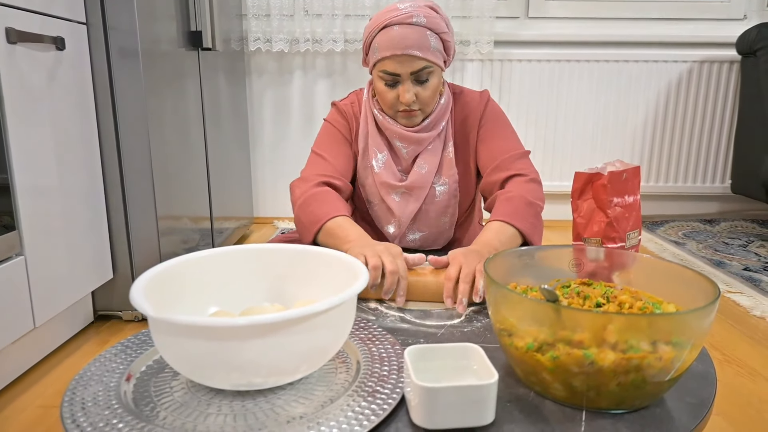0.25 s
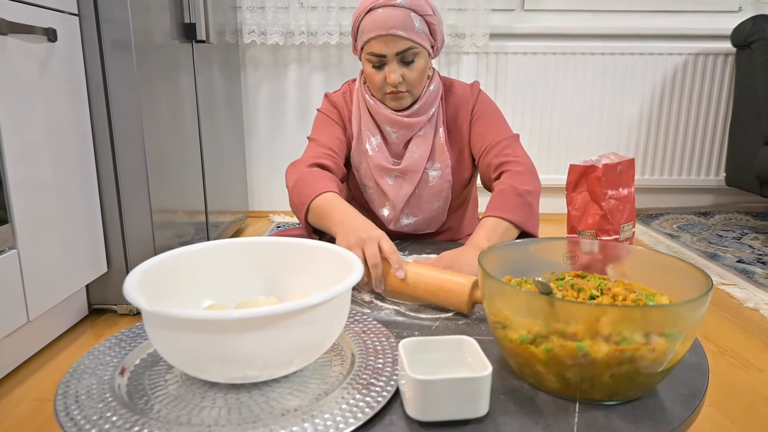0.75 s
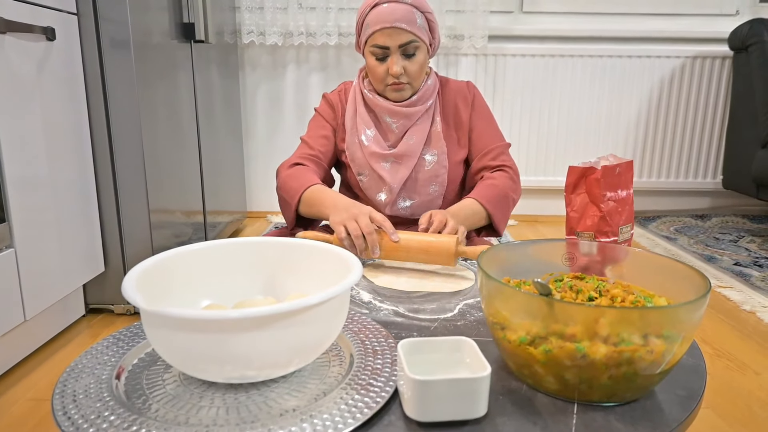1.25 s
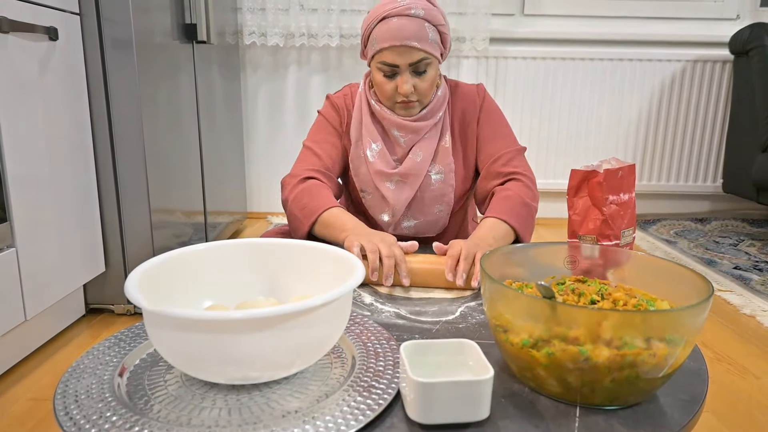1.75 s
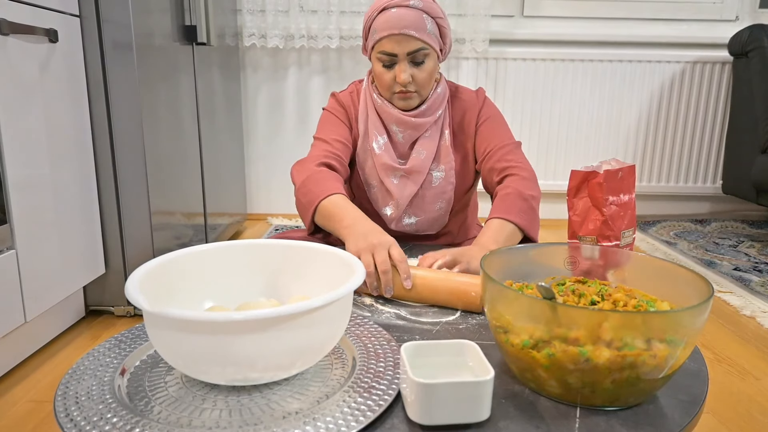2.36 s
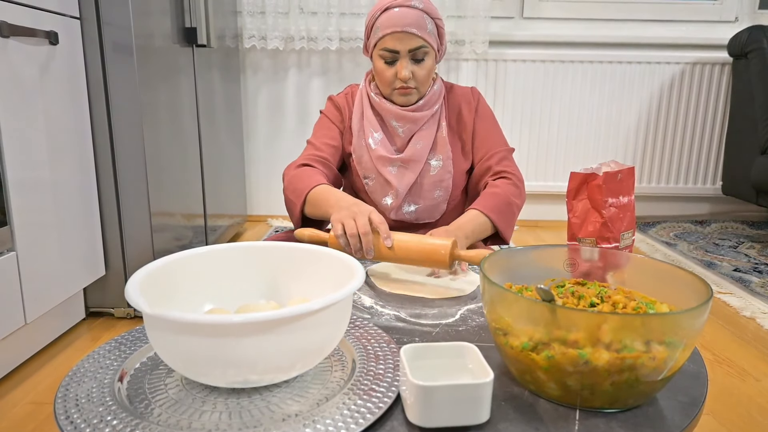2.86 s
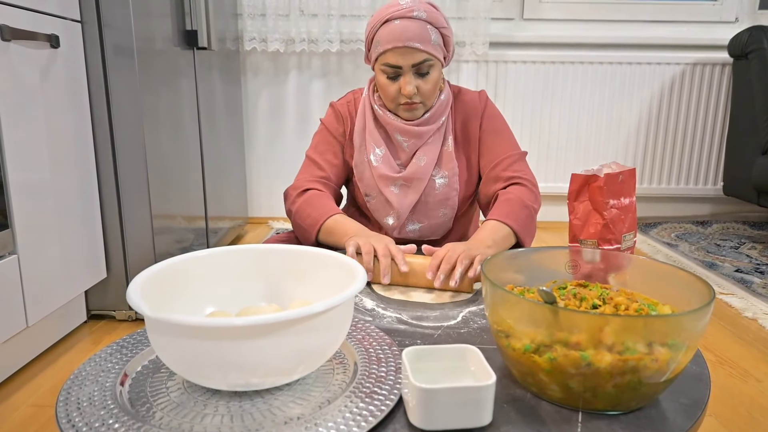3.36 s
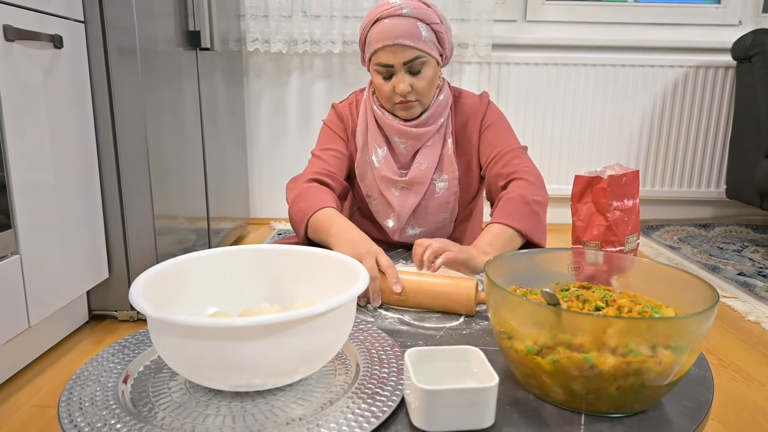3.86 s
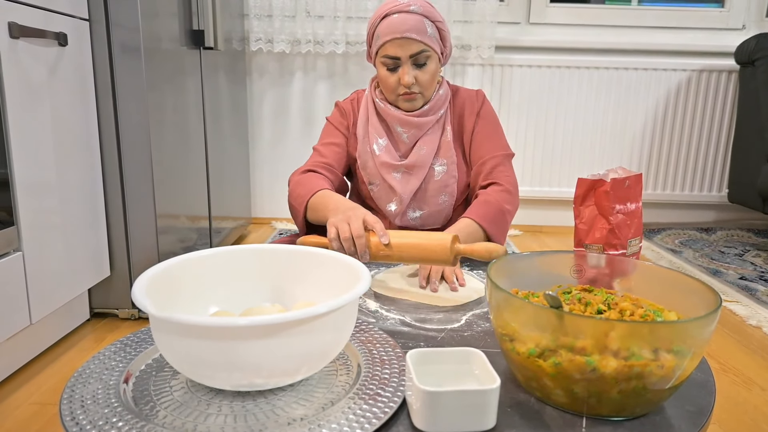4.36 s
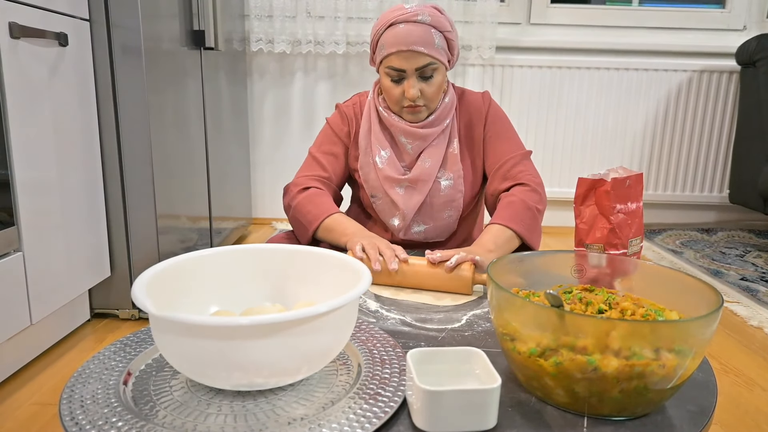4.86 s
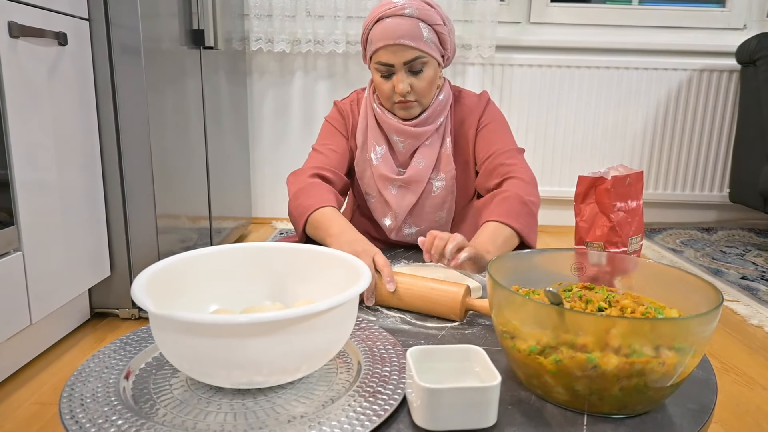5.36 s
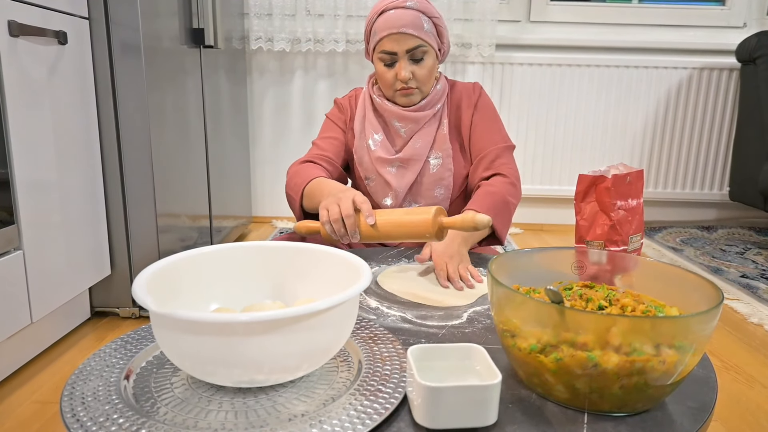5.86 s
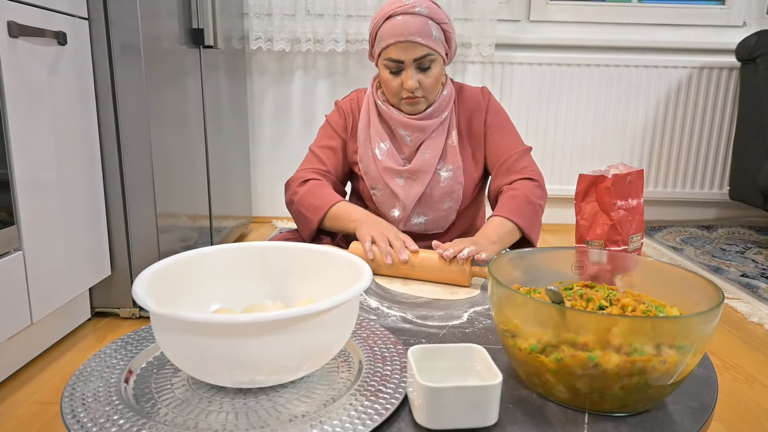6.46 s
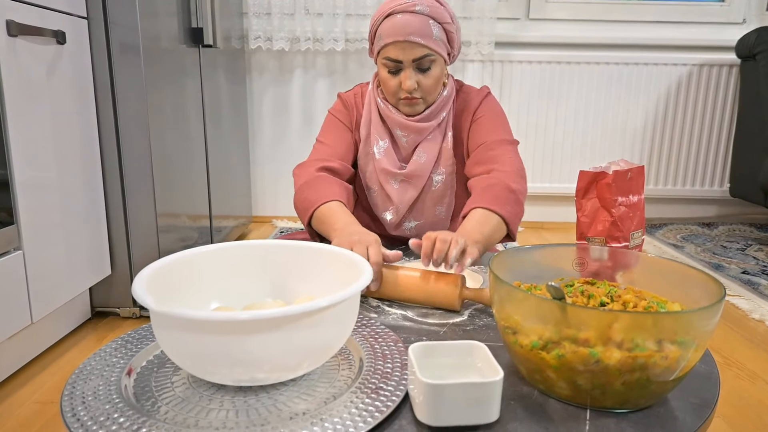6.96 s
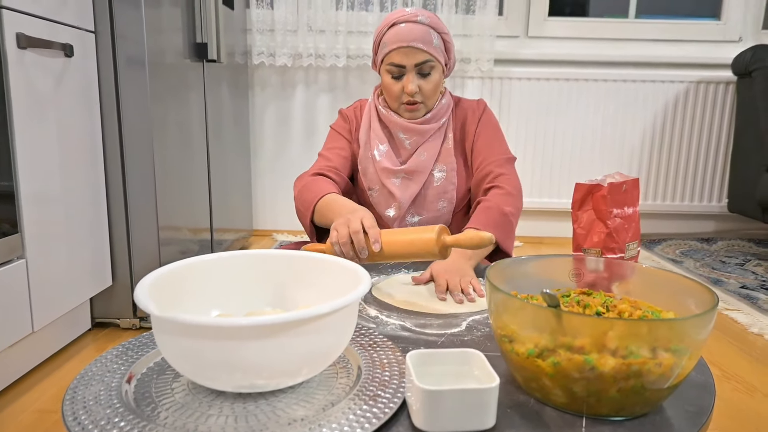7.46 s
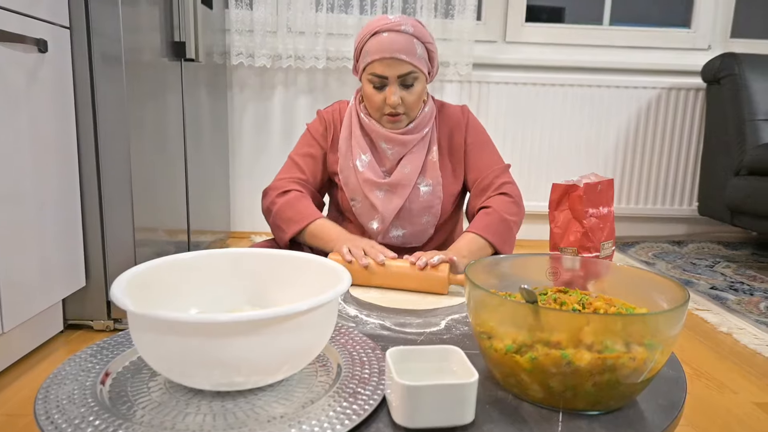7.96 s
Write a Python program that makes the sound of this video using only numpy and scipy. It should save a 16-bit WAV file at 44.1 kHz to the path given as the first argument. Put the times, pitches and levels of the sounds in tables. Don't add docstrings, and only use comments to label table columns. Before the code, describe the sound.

Soft, dry hisses of a rolling pin over floured dough alternate with dull wooden thuds on a board. Just before one second a bright, sharp clack sets glass ringing, quickly damped. Steady rolling continues with small knocks, ticks and tiny clinks; past six seconds a heavier thud, firmer push and rough wood drag, then a brief low squeal and last tick. Near microphones, short room echo, low fridge hum.

```python
import sys
import numpy as np
from scipy import signal
from scipy.fft import rfft, irfft, next_fast_len
from scipy.io import wavfile
from scipy.ndimage import uniform_filter1d

SR = 44100
rng = np.random.default_rng(int(sys.argv[2]) if len(sys.argv) > 2 else 0)


def to_linear_factor(level_db):
    exponent = np.asarray(level_db, float) / 20
    return 10 ** exponent


def inscribe(sig):
    pcm = np.round(np.clip(np.atleast_2d(sig).T, -1, 1) * 32767)
    wavfile.write(sys.argv[1], SR, pcm.astype(np.int16))


N = 362268
BOWL_KNOCK_S = 0.8265


def evened(x):
    return x / np.sqrt(np.mean(x ** 2) + 1e-20)


def read(points, hz):
    f, value = np.transpose(points)
    return np.interp(np.log(hz + 1), np.log(f + 1), value)


def add(mix, s, sound):
    part = mix[..., round(s * SR):][..., :sound.shape[-1]]
    part += sound[..., :part.shape[-1]]


def curve(rows, column):
    rows = np.array(rows)
    return np.interp(np.arange(N) / SR, rows[:, 0], rows[:, column])


def ring(notes, gains_db=0, peak_s=0.000432, seconds=0.81, loose=0.91, flutter_db=0):
    hz, db, t60 = np.transpose(notes)[:, :, None]
    t = np.arange(int(seconds * SR)) / SR
    swell = np.sin(np.pi / 2 * np.minimum(t / (0.81 * peak_s), 1)) ** 2
    angle = 2 * np.pi * hz * (peak_s - t) + loose * rng.standard_normal(hz.shape)
    if flutter_db:
        knots = np.arange(0, 0.5, 0.008)
        wobble = rng.standard_normal((len(hz), len(knots)))
        waver = np.array([np.interp(t, knots, row) for row in wobble])
        db = db + flutter_db * waver
        angle = angle + flutter_db / 6 * waver[::-1, ::-1]
    fade_db = db + np.reshape(gains_db, (-1, 1)) - 60 * t / t60
    return swell * (to_linear_factor(fade_db) * np.sin(angle)).sum(0)


def resonate(x, hz, width):
    turn = np.exp(2j * np.pi * np.cumsum(hz) / SR)
    r = np.exp(-np.pi * width / SR)
    return 2 * (turn * signal.lfilter([1 - r], [1, -r], x / turn)).real


def hiss(layers, same, patchy_db, flicker_db):
    frames, hz = N // 128 + 5, np.fft.rfftfreq(512, 1 / SR)
    a, b, c, d, patches = rng.standard_normal((frames, 257, 5)).T
    patches = uniform_filter1d(patches, size=5, axis=0)
    patches = evened(uniform_filter1d(patches, size=16, axis=1))
    flicker = evened(uniform_filter1d(rng.standard_normal(frames), size=4))
    at = np.minimum(np.arange(frames) * 128, N - 1)
    power = 0
    for colour, level_db in layers:
        power = power + np.outer(evened(to_linear_factor(read(colour, hz))), to_linear_factor(level_db[at])) ** 2
    like = np.clip(read(same, hz), -1, 1)[:, None]
    left = a + 1j * b
    z = np.array([left, like * left + np.sqrt(1 - like ** 2) * (c + 1j * d)])
    unit = np.std(signal.istft(z[0], nperseg=512, noverlap=384)[1])
    z *= np.sqrt(power) * to_linear_factor(patchy_db * patches + flicker_db * flicker)
    return signal.istft(z, nperseg=512, noverlap=384)[1][:, :N] / unit


# fastest t/s, rise/s, fall/s, level/dB, lightness of touch/dB
PUSHES_OUT = [
    (.25, 0.2803, 0.21, -46, 0.5),
    (1.92, 0.29, 0.16, -45, -2),
    (3.51, 0.24, 0.19, -45.5, 0),
    (5.04, 0.23, 0.23, -46, -2),
    (6.79, 0.24, 0.14082, -42.5, -4.5),
    (8.11, 0.17813, 0.327, -45.5, -4.5),
]
PULLS_BACK = [
    (1.062, 0.27, 0.16, -44.5, 0.162),
    (2.73, 0.19, 0.16, -45.5, 0.5),
    (4.28, 0.26, 0.19, -45.5, -1.1),
    (5.809, 0.18, 0.19, -46, 3),
    (6.07, 0.1115, 0.05648, -53, 1.518),
    (7.502, 0.28, 0.16726, -44.5, 0.2),
]
# t/s, rise/s, fall/s, level/dB
PALMS = [
    (1.5, 0.04843, 0.1291, -62),
    (3.17, 0.0506, 0.1349, -63.5),
    (4.73, 0.0841, 0.1365, -64),
    (6.39, 0.0409, 0.05866, -62),
    (.45, 0.1406, 0.13, -64.5),
    (7.24, 0.03536, 0.048, -65.5),
    (7.92, 0.1009, 0.2243, -63),
]
# t/s, rise/s, fall/s, level/dB
SHIVERS = [
    (.74, 0.02965, 0.269, -49.5),
    (.81, 0.01958, 0.0202, -47),
    (7.3, 0.0853, 0.18, -54),
    (.87, 0.0332, 0.15, -38.5),
    (2.42, 0.047, 0.1404, -48.5),
    (4.03, 0.034, 0.1214, -52.5),
    (4.73, 0.0544, 0.1065, -57),
    (5.311, 0.02346, 0.11013, -50),
    (5.6, 0.0825, 0.095, -49),
    (6.44, 0.1117, 0.49, -52.5),
]
# flour level/dB, sliding dough level/dB, sleeve level/dB, rumble level/dB
SHARES = [
    (1, 0, -10, -1),
    (-6.5, 1, -12.5, -12),
    (-15, -14, 4, 5),
    (-5, -10.5, -33.5, 2),
]
STILL_DB = (-62.5, -66, -69.5, -62.5)
# change of the four layers, dB per dB
LIGHT_TOUCH = (-0.21, 0.58, 0.925, 0.14)


def strokes_db():
    t = np.arange(0, N + 128, 128) / SR
    power = to_linear_factor(np.array(STILL_DB))[:, None] ** 2
    for rows, share_db in zip([PUSHES_OUT, PULLS_BACK, PALMS, SHIVERS], SHARES):
        top, rise, fall, db, *light_db = np.transpose(rows)[:, :, None]
        rising, falling = (abs(top - t) / rise) ** 1.9992, (abs(t - top) / fall) ** 2.4
        away = np.where(t < top, rising, falling)
        mix_db = np.array(share_db) + np.array(LIGHT_TOUCH) * sum(light_db, 0 * db)
        power = power + to_linear_factor(2 * mix_db.T) @ to_linear_factor(2 * (db - 12.5 * np.minimum(away, 10)))
    return [np.interp(np.arange(N) / SR, t, 10 * np.log10(p)) for p in power]


# f/Hz, level/dB, time to fade by 60 dB/s
BOARD = [(72.3, -13.5, 0.56), (103.6, 0, 0.23856), (135, -13, 0.2233), (172, 1.5, 0.28), (206.5, 5, 0.26),
         (242, -0.5, 0.11), (268, -29.5, 0.17), (302.92, -1.5, 0.23), (334.66, 1.5, 0.13),
         (378.78, -0.5, 0.14), (429.6, -4.5, 0.43), (488, 4.5, 0.15364), (540, -8, 0.2743), (622, -2, 0.14),
         (690, -11, 0.261), (720, 4, 0.18), (799, -3, 0.19), (895, 1, 0.075), (1192, -17, 0.3218)]


def board_under(level_db, per_s, spread_db):
    slips = rng.standard_normal(N) * to_linear_factor(spread_db * rng.exponential(1, N))
    slips = slips * (rng.random(N) < per_s / SR)
    held = [(hz, db + 1.5 * np.log2(hz / 400), t60 * 0.35) for hz, db, t60 in BOARD[4:]]
    shaken = signal.oaconvolve(slips, ring(held, peak_s=0.00294, seconds=0.205))
    return evened(shaken[:N]) * to_linear_factor(level_db)


# f/Hz, level/dB per Hz
FLOUR = [(410, -15.5), (700, -5.5), (842, -14.5), (920, -1), (1070, -7.5), (1420, 0.5), (1730, -3),
         (2200, -5.5), (2840, -9.5), (3200, -10), (4160, -41), (7040, -120)]
# f/Hz, level/dB per Hz
SLIDE = [(1050, -20), (1300, -18), (1550, -2), (1900, -8.5), (2350, 0), (2700, -4.5), (3030, -1.5),
         (3350, -4), (4080, -6), (4560, -9.5), (6460, -14.5), (9000, -34), (11700, -56), (19800, -120)]
# f/Hz, level/dB per Hz
SLEEVES = [(2350, -30), (4000, -7), (4560, 0.5), (5450, 0), (6770, 2.5), (13800, -11), (15700, -11)]
# f/Hz, likeness (1 = the same)
FLOUR_SAME = [(60, 1), (180, 0.79), (550, 0.89), (1650, 0.9192), (4970, 0.25), (15000, 0.03)]


def pushes():
    *level_db, rumble_db = strokes_db()
    layers = list(zip([FLOUR, SLIDE, SLEEVES], level_db))
    rubbing = hiss(layers, FLOUR_SAME, patchy_db=1.25, flicker_db=0.67)
    return rubbing + board_under(rumble_db, per_s=2600, spread_db=-1.5)


# t/s, peak level/dB, thump under 150 Hz level/dB,
# share of the free ringing time, notes beside the two main ones level/dB
LANDINGS = [(1.448, -20.5, 4, 0.8, -13), (1.474, -20.5, 2, 0.6, -13), (1.503, -21, 4, 0.25, -9),
            (1.553, -35, -1.5, 0.4, -9), (1.598, -38, -5.5, 0.3, -6), (3.104, -21.5, 3.5, 0.9, -12),
            (4.673, -14.5, 2, 0.689, -4), (6.354, -7.5, -1, 0.45, -6), (5.64, -37, 6, 0.5677, -1),
            (6.381, -17, 3, 0.6, -4), (6.444, -28, 0, 0.8, -3), (6.89, -39, 5, 0.802, -1),
            (7.001, -33, -3, 0.4, -6), (7.23, -34.5, 1, 0.626, -8), (7.258, -38, 0, 0.45, -8),
            (7.823, -18.5, 3, 0.8, -12)]
# t/s, peak level/dB, thump under 150 Hz level/dB,
# middle notes level/dB, upper notes level/dB
BUMPS = [(0.7, -19.5, -24, 0, -14), (.822, -16, -8, 5, 8), (.829, -27, -6, 5, -9), (.836, -23.5, -5, 7, -4),
         (2.064, -45.5, -1, 9.5, 7.5), (2.368, -25, -17.5, -8, -12.5), (2.399, -32, -5, -3, -6),
         (2.409, -36.5, -3.5, 1, -4.5), (2.456, -30.5, -3, -8, -18.5), (2.466, -33.5, 5.5, -3.5, -18),
         (3.983, -16, -8, -10, -33.5), (3.991, -31, -13.5, -16, -31), (4.011, -30, -13.5, -23, -28),
         (4.034, -27.5, -1, -14.5, -32.5), (5.285, -29, -29.5, -31, -17), (5.464, -12.5, -17.5, 1, -13.5),
         (5.476, -23, -17, -1, -11), (5.516, -26.5, -4, 0, -12.5), (5.586, -33, 0, -2.5, -9.5),
         (7.143, -38, -15.5, -3.5, -6), (7.476, -41.5, -11.5, 3, 1)]
FREE_HZ = (104, 205)


def knocks():
    out, (hz, level_db, t60) = np.zeros(N), np.transpose(BOARD)
    group = np.searchsorted([150, 260, 600], hz)
    beside = (hz < 260) & (abs(hz[:, None] / np.array(FREE_HZ) - 1).min(1) > 0.07)
    blows = [(*row[:3], -17.5, -25, *row[3:], True) for row in LANDINGS]
    for row in BUMPS:
        free = 0.45 if abs(row[0] - BOWL_KNOCK_S) < 0.02 else 0.79
        blows.append((*row, free, 0, False))
    place_db = 1.5 * rng.standard_normal((len(blows), len(BOARD)))
    for (s, db, low_db, mid_db, high_db, free, beside_db, soft), place in zip(blows, place_db):
        gains_db = np.array([low_db, 0, mid_db, high_db])[group] + place + beside_db * beside
        blow_s, loose = (0.0075, 0.45) if soft else (0.0082, 0.88)
        notes = np.transpose([hz * (1 + 0.0039 * place), level_db, t60 * free])
        blow = ring(notes, gains_db, blow_s, 0.3, loose)
        sunk = soft * np.clip((np.arange(len(blow)) / SR - 0.055) / 0.03, 0, 1)
        add(out, s + 0.00976 - blow_s, to_linear_factor(db - 8.0 - 7 * sunk) * blow)
    return out


# t/s, peak level/dB, tilt/dB per octave, grit behind it level/dB
TICKS = [(0.7023, -36.5, -8, 0), (0.7227, -34.5, -37, 0), (0.8264, -7, -8.5, -23), (0.8458, -24, -6, 8),
         (0.8268, -29, 14, -35), (0.8335, -35, 16, -35), (0.8375, -32, 8, -30), (1.4537, -42, -8.5, -11.5),
         (1.4762, -42, -6, -1), (2.068, -39, -13.5, -1), (2.371, -39.5, -1, -3), (2.403, -34, -8, -4),
         (2.4626, -37.5, -3.5, 0.5), (3.121, -47, -1, 4), (3.9849, -33, -6, -4), (4.0203, -37, -4.5, -3),
         (4.562, -55, -8.5, -2.5), (4.6745, -42.5, -7.5, 2), (4.8608, -40, 5.5, -5),
         (5.467, -37.5, -3.5, 1), (5.481, -29.5, -20, -5.5), (5.584, -35.5, -2, -9),
         (6.3655, -34, -13.5, -2), (6.4985, -34.5, 5.5, -5.5), (7.481, -41.5, -10.5, -6),
         (7.2187, -41.5, -10, -1.5), (7.3753, -33, 16.5, -15), (7.7556, -45, -6, -1), (7.825, -48, -7, 5.5),
         (7.9911, -44, 8, -1), (8.065, -36, -21, -16.5), (8.192, -33, -7, -8)]
# f/Hz, level/dB per Hz
EDGE = [(120, -45), (500, -10.5), (1000, -9), (1250, -3.5), (1600, 1.5), (1950, -1), (2300, 1), (2800, -11),
        (3300, 0), (3800, -7.5), (4400, -9.5), (8000, -22.5), (15500, -40.5)]


def ticks():
    out, t, hz = np.zeros((2, N)), np.arange(8192) / SR, np.fft.rfftfreq(16384, 1 / SR)
    for s, db, tilt, grit_db in TICKS:
        grit_s = max(0.18 * to_linear_factor(0.89 * grit_db), 0.01)
        pan_db = 0
        if abs(s - BOWL_KNOCK_S) < 0.01:
            pan_db = -4.5
        if s > 8.15:
            pan_db = -18
        trickle = (1 - np.exp(-t / 0.0057)) * to_linear_factor(grit_db - 60 * t / grit_s)
        grit = rng.standard_normal(len(t)) * (to_linear_factor(-60 * t / 0.013) + trickle)
        colour = to_linear_factor(read(EDGE, hz) + (tilt + 3.0) * np.log2(np.maximum(hz, 1000) / 2500))
        click = np.roll(irfft(rfft(grit, 16384) * colour), 64)
        sides = to_linear_factor(db + np.array([[pan_db / 2], [-pan_db / 2]]))
        add(out, s + 0.001033 - 64 / SR, sides * click / abs(click).max())
    return out


# t/s, level/dB, loudest band f/Hz
DRAG = [
    (6.708, -48, 697.8),
    (6.722, -31.5, 693.4),
    (6.745, -33, 420),
    (6.82, -31, 530),
    (6.868, -34, 490),
    (6.91, -34.5, 300),
    (6.94, -52, 400),
    (7.14, -52, 477.3),
    (7.2, -61.5, 400.2),
]


def drag():
    t = np.arange(N) / SR
    on = np.clip(np.minimum(t - DRAG[0][0], DRAG[-1][0] - t) / 0.00589, 0, 1)
    shake = board_under(0, per_s=2200, spread_db=1.5)
    hz = curve(DRAG, 2)
    band = resonate(resonate(shake, hz, 520.), hz, 520.)
    return to_linear_factor(curve(DRAG, 1)) * on * evened(0.25 * shake + 2 * band)


# t/s, length/s, level/dB, f/Hz, width/Hz
SQUEAKS = [
    (0.612, 0.035, -66, 5080, 300),
    (0.645, 0.045, -65, 5130, 250),
    (1.326, 0.0278, -65, 8391, 300),
    (2.959, 0.03296, -66, 9212, 250),
    (4.521, 0.02903, -72.5, 8603, 400),
    (4.612, 0.0432, -62, 8930, 500),
    (4.617, 0.0383, -66.5, 4169, 250),
    (5.298, 0.31, -64.5, 3390, 280),
    (7.982, 0.0745, -47, 1650, 120),
    (8.002, 0.0731, -43, 1960, 220),
]


def squeaks():
    out = np.zeros(N)
    for s, length, db, hz, width in SQUEAKS:
        u = np.arange(0, 1, 1 / (length * SR))
        band = hz * np.ones(len(u))
        noise = rng.standard_normal(len(u))
        whistle = evened(resonate(resonate(noise, band, width), band, width))
        add(out, s, to_linear_factor(db) * np.sin(np.pi * u ** 0.423) ** 1.24 * whistle)
    return out


# f/Hz, level/dB, time to fade by 60 dB/s
BOWL = [(1155, -9, 0.2245), (1205.1, 1, 0.43), (1235.8, -9.5, 0.35), (1280.1, -12, 0.1944),
        (1454.6, -2, 0.297), (1592.1, -4.5, 0.3277), (1870, -4, 0.2874), (2242, -7, 0.3),
        (2265, -4, 0.3792), (2256, -3, 0.3), (3192, -4, 0.37), (3225, -4.5, 0.1335), (3240, -2.5, 0.4921),
        (3319.6, -7, 0.2125), (4280, -7, 0.2), (4353, -1.5, 0.2), (4360, -5, 0.25), (5570, -16, 0.2918),
        (5597, -6.5, 0.45), (6730, -23.5, 0.3037), (6910, -20, 0.2475), (6940, -14, 0.33),
        (6980, -16.5, 0.2), (8600, -23, 0.25), (8540, -26.5, 0.1565), (9126, -30.5, 0.1307),
        (9700, -29.5, 0.1393), (10027, -27, 0.1494), (10600, -25, 0.146), (11880, -29.5, 0.2062),
        (11850, -22, 0.2), (12700, -36, 0.15), (13280, -28, 0.1), (13790, -35, 0.25), (14850, -35, 0.25)]
# t after the knock/s, level/dB
ROCKS = [
    (.011, -15),
    (.019, -14),
    (.047, -8),
    (.084, -17),
]
# t/s, swell/s, level/dB, f/Hz, time to fade by 60 dB/s
LATE_NOTES = [(0.8351, 0.02, -31, 1211, 0.3), (.925, .024, -26, 1216, .17), (.95, .03, -47, 3236, .25),
              (.84, 0.0148, -32, 3500, .2), (.866, .01, -33, 3228, .15), (5.475, .02, -26, 427, .28),
              (5.6, .03, -40, 427, .15), (5.288, 0.0081, -37, 205, .3), (6.364, 0.00793, -28, 425, .12),
              (6.362, 0.011, -31, 700, .1), (6.385, .01, -39, 700, .06), (6.4, .015, -41, 425, .12),
              (2.372, .006, -28, 490, .1), (2.46, .008, -33, 480, .1), (1.458, 0.00796, -44, 710, .12),
              (4.678, .006, -32, 479, .1), (4.68, .006, -35, 415, .09), (4.68, .006, -38, 700, .07),
              (4.68, .006, -36, 307, .2), (6.56, .03, -52, 450, .15), (.72, 0.0101, -29, 168, .25),
              (7.99, .015, -41.5, 600, .15)]


def glass():
    out = np.zeros((2, N))
    tilt_db = 2.5 * np.log2(np.transpose(BOWL)[0] / 2000)
    sides = np.array([ring(BOWL, tilt_db, seconds=0.35, loose=0.5, flutter_db=3.0) for mic in out])
    sides = sides * to_linear_factor(-90 * np.maximum(np.arange(sides.shape[1]) / SR - 0.085, 0))
    for after_s, db in [(0.000735, 0.00015), *ROCKS]:
        add(out, BOWL_KNOCK_S + after_s, to_linear_factor(db - 29.5) * sides)
    for s, swell_s, db, hz, t60 in LATE_NOTES:
        note = [(hz, db + 60 * swell_s / t60, t60)]
        add(out, s, ring(note, peak_s=swell_s, seconds=0.3, flutter_db=2.5))
    return np.array([np.roll(out[0], 1) * to_linear_factor(-4.5), out[1] * to_linear_factor(-5.0)])


# t/s, level/dB, f/Hz, time to fade by 60 dB/s
CLINKS = [(.721, -41, 3287, 0.076), (2.066, -45, 2321, 0.0478), (2.37, -51, 3279, 0.2585),
          (2.371, -33.5, 1543, 0.02345), (2.381, -35, 1476, 0.044), (2.403, -34.5, 1570, 0.0306),
          (2.409, -35, 1502, 0.0347), (2.419, -34.5, 1502, 0.0247), (2.437, -38, 1603, 0.0243),
          (2.462, -42, 1610, 0.037), (2.473, -42, 2332, 0.02845), (2.418, -36, 3250, 0.03165),
          (3.987, -34, 1555, 0.03176), (3.986, -38.5, 1998, 0.0293), (3.986, -37, 2397, 0.0316),
          (3.986, -38.5, 2897, 0.02128), (3.986, -45, 3382, 0.0193), (3.995, -38, 1851, 0.02984),
          (4.033, -40, 1787, 0.0305), (5.468, -35, 3541, 0.02208), (5.468, -39, 4208, 0.01567),
          (5.484, -37, 2191, 0.04114), (5.469, -38, 1483, 0.03047), (8.016, -44, 1978, 0.069),
          (8.194, -26.5, 1650, 0.02343)]


def clinks():
    out = np.zeros(N)
    for s, db, hz, t60 in CLINKS:
        split = [(hz * 0.94, db - 8, t60), (hz, db - 2, t60), (hz * 1.05, db - 6, t60)]
        add(out, s, ring(split, peak_s=0.0015, seconds=0.15))
    return out


# f/Hz, time to fade by 60 dB/s
KITCHEN = [(150, 0.3), (600, 0.2541), (2000, 0.23), (6000, 0.3294), (14000, 0.12027)]


def kitchen(x):
    taps, starts = np.zeros((2, SR // 2)), np.arange(200, SR // 2 - 20, 20)
    at = starts + rng.integers(0, 20, (2, len(starts)))
    np.put_along_axis(taps, at, rng.choice([-1., 1.], at.shape), 1)
    hz, t, z = signal.stft(taps, SR, nperseg=256)
    apart = np.clip(hz / 1500, 0, 1)[:, None]
    z[1] = apart * z[1] + np.sqrt(1 - apart ** 2) * z[0]
    fade = to_linear_factor(-60 * t / read(KITCHEN, hz)[:, None])
    tail = signal.istft(z * fade, SR, nperseg=256)[1]
    return signal.fftconvolve(x, tail / np.linalg.norm(tail[0]), axes=1)[:, :N]


# f/Hz, level/dB per Hz
AIR = [(12, -47), (20, -12.5), (53, -3), (93, -6), (126, -5.5), (208, -4), (226, -7.5), (354, -11.5),
       (467, -17.5), (1470, -22.5), (1690, -16.5), (3290, -30), (3890, -29.5), (9240, -35), (15700, -43.5)]
# f/Hz, likeness (1 = the same)
AIR_SAME = [(60, 0.8649), (180, 0.92), (550, 0.69), (1650, -0.26), (4970, -0.2707), (15000, -0.1528)]
# f/Hz, width/Hz, level/dB
FRIDGE = [
    (123.69, 13.95, -58.5),
    (1650, 224.2, -63),
    (2288.8, 97, -73),
]


def background():
    size = next_fast_len(N)
    hz, noise = np.fft.rfftfreq(size, 1 / SR), rfft(rng.standard_normal((3, N)), size)
    like = np.clip(read(AIR_SAME, hz), -1, 1)
    right = like * noise[0] + np.sqrt(1 - like ** 2) * noise[1]
    air = np.array([noise[0], right]) * to_linear_factor(read(AIR, hz))
    out = to_linear_factor(-51) * evened(irfft(air, size)[:, :N])
    for f, width, db in FRIDGE:
        band = noise[2] / (1 + (2 * (hz - f) / width) ** 2)
        out = out + to_linear_factor(db) * evened(irfft(band, size)[:N])
    return out


def scene():
    wood = (knocks() + drag())[None]
    edges, notes, small = ticks(), glass() + squeaks(), clinks()
    no_bass = signal.butter(2, 65., "high", fs=SR, output="sos")
    wood = signal.sosfilt(no_bass, wood)
    room = kitchen(to_linear_factor(-6.0) * small + to_linear_factor(-12.) * wood + to_linear_factor(-0.5) * edges + to_linear_factor(-0.5) * notes)
    return wood + edges + notes + small + room + pushes() + background()


def top_cut(x):
    return signal.sosfilt(signal.butter(12, 16190, fs=SR, output="sos"), x)


def record(dry):
    size = next_fast_len(N)
    kept = np.fft.rfftfreq(size, 1 / SR) < 15730
    mix = irfft(rfft(dry, size) * kept, size)[:, :N]
    return top_cut(mix)


dry = scene()
out = record(dry)
inscribe(out)
```